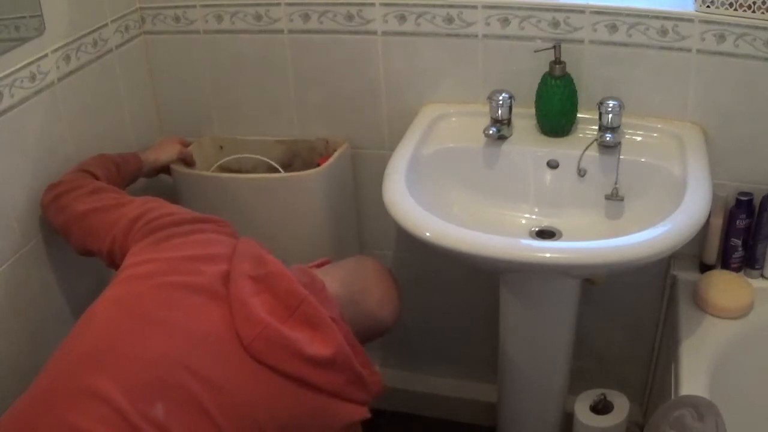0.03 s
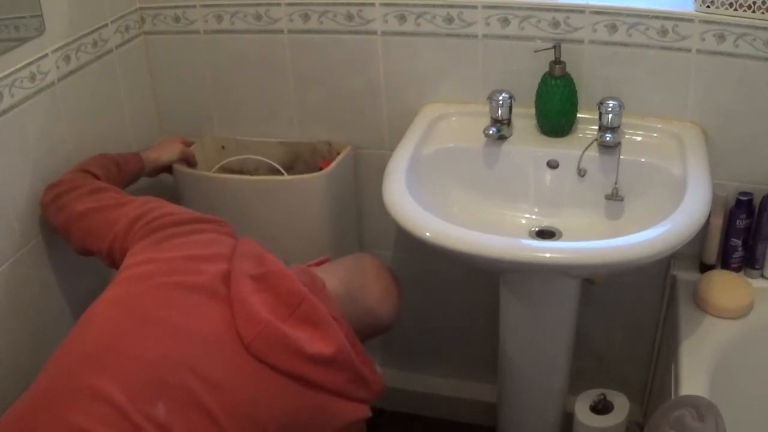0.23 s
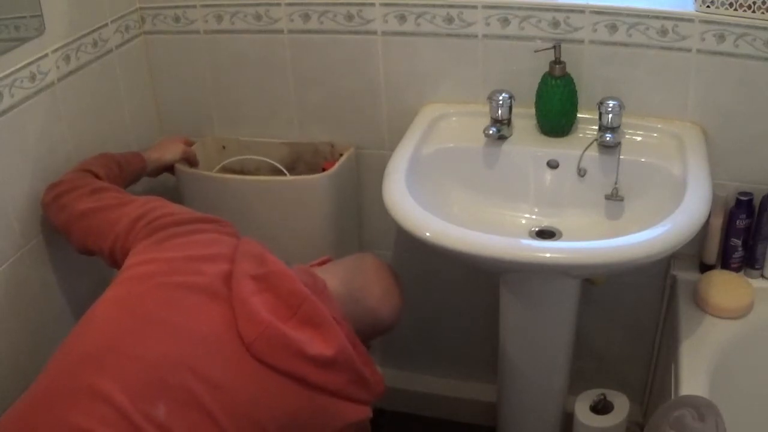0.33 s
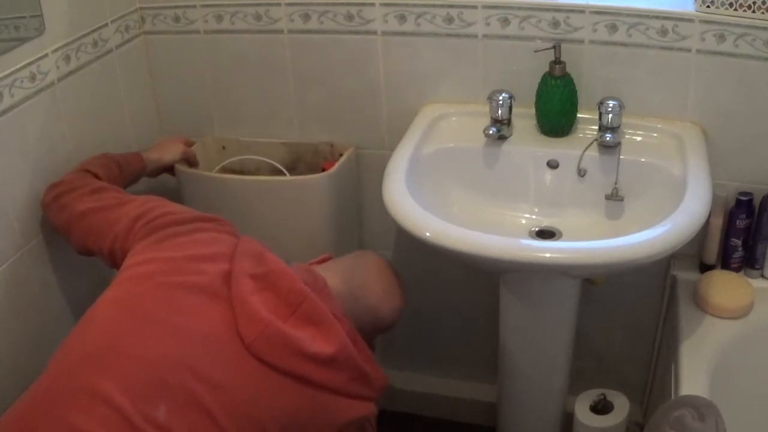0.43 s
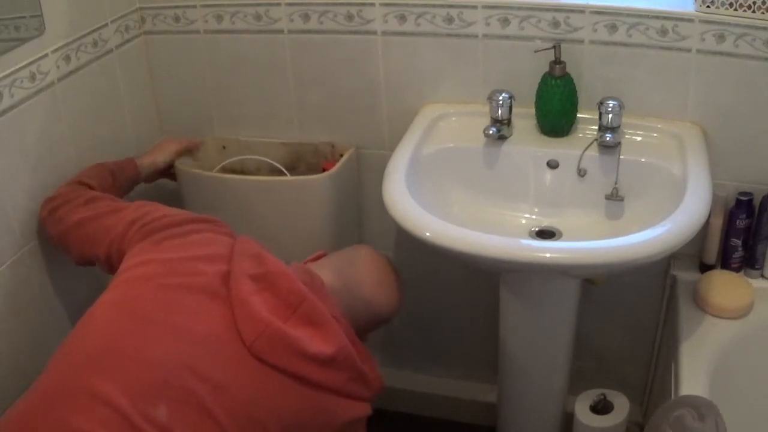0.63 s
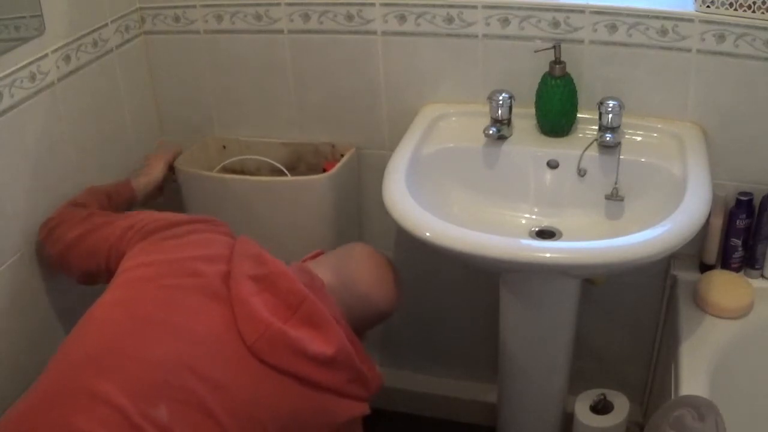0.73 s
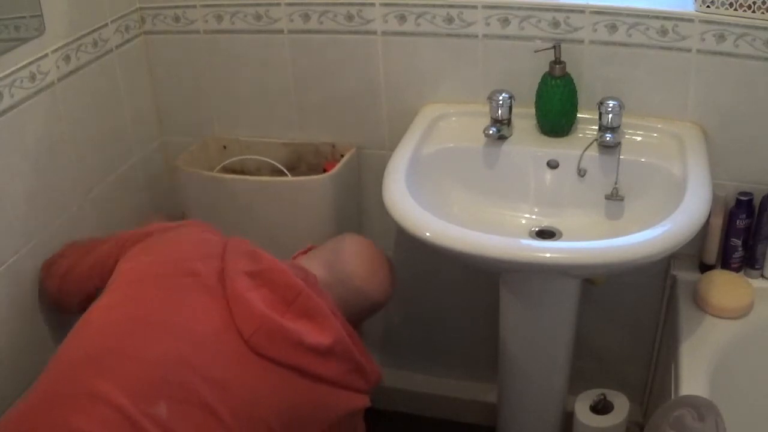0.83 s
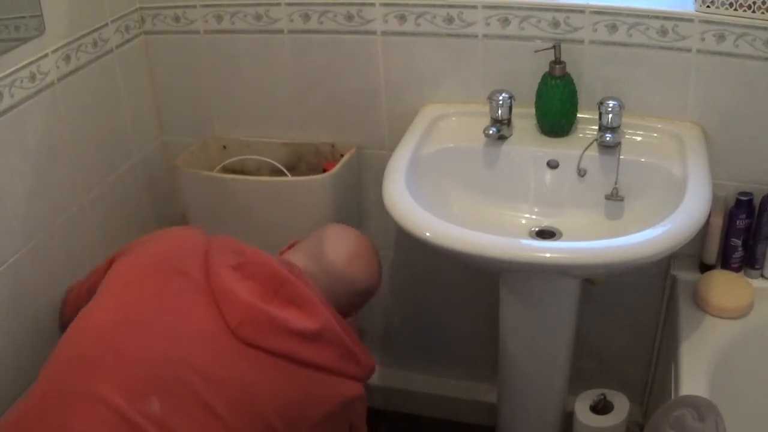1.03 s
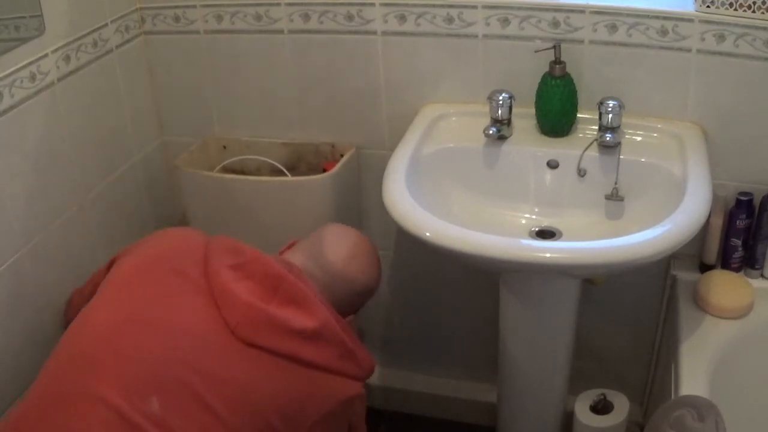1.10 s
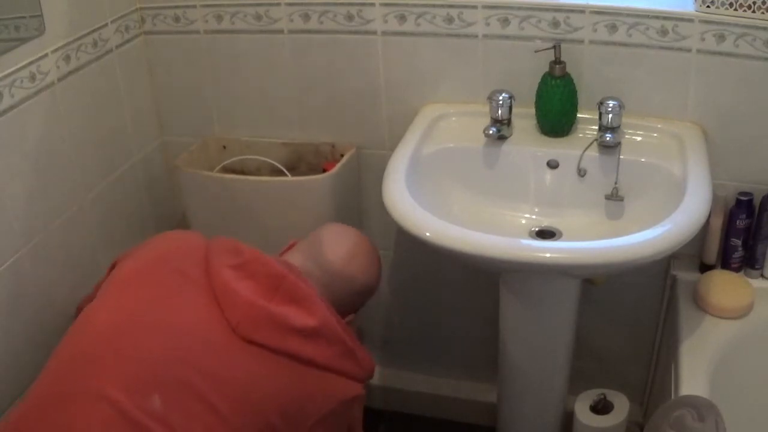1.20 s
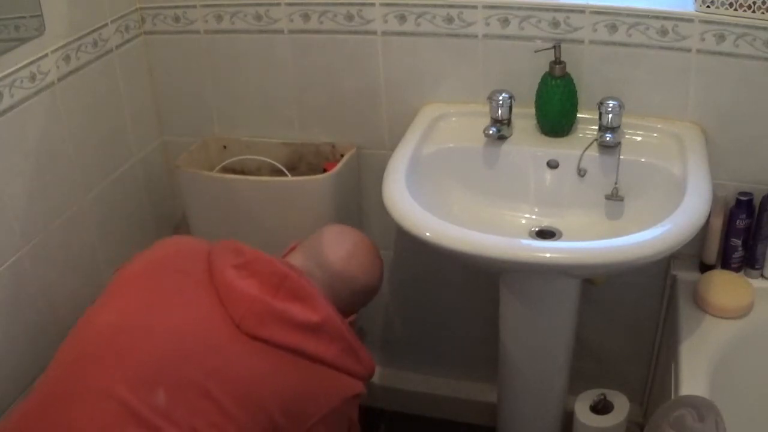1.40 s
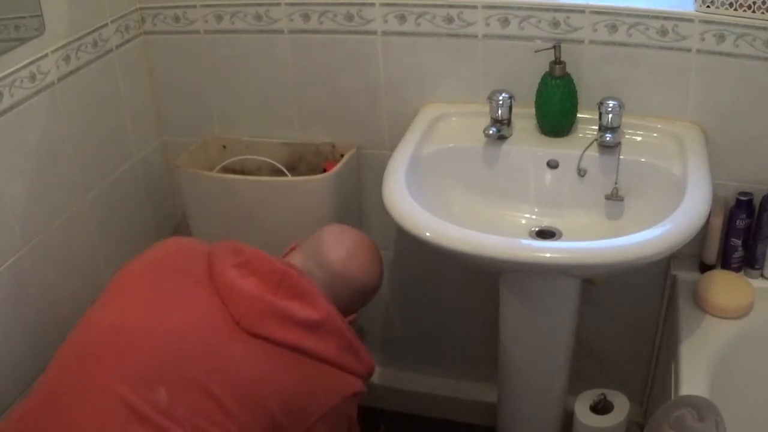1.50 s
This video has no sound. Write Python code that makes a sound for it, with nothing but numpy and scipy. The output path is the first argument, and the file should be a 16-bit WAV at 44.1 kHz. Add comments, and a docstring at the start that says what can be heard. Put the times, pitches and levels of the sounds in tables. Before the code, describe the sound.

A toilet tank booms and rattles briefly as a fitting sticks, followed by light clicks.

```python
"""A stiff fitting judders as someone works it beside an open toilet cistern in a small tiled bathroom.
It sticks and slips many times a second, which makes the water tank boom and rattle.
Then plastic parts click and scuff against the ceramic, and both ring briefly.
Soft bumps and a rubbing sleeve lie over a low room hum, and the tiles add a short echo."""
import sys
import numpy as np
from scipy import signal
from scipy.fft import rfft, irfft, next_fast_len
from scipy.io import wavfile

SR = 44100
rng = np.random.default_rng(int(sys.argv[2]) if len(sys.argv) > 2 else 0)


def output_pcm(signal):
    """Save a mono or channel-first signal as 16-bit PCM at the path in sys.argv[1].

    Samples are clipped to [-1, 1] before scaling.
    """
    pcm = np.clip(np.atleast_2d(signal).T, -1, 1) * 32767
    wavfile.write(sys.argv[1], SR, np.round(pcm).astype(np.int16))


N = 68355
T = np.arange(N) / SR

# tone colour of the still room: (frequency [Hz], relative level [dB])
ROOM_COLOUR = [(20, 2), (70, -14), (100, -13.5), (170, 4), (240, -4.5), (360, -5.5), (600, -15.5),
               (1200, -19.5), (3000, -26), (7000, -29), (11000, -31.5)]
# tones of the room hum: (frequency [Hz], level [dB])
HUM_TONES = [(102.5, -54), (113, -62)]
# how hard the sleeve rubs: (time [s], level [dB])
SLEEVE_LEVELS = [(0, -56), (0.14, -52), (0.6, -64), (0.95, -59), (1.1, -76), (1.17, -58.5), (1.22, -49),
                 (1.3, -52), (1.37, -50.5), (1.45, -54), (1.55, -51.5)]
# tone colour of the sleeve: (frequency [Hz], relative level [dB])
SLEEVE_COLOUR = [(150, -4.5), (400, 6.5), (750, 3.5), (1100, -0.5), (1450, 6.5), (2100, -11), (3300, -7.5),
                 (4000, -15.5), (4600, -4), (6000, -26), (11000, -27.5)]
# soft bumps on the tank: (time [s], fade time [s], knock level [dB], thud level [dB])
BUMPS = [(0.0, 0.019, -29.5, -67), (0.055, 0.08, -39, -60), (0.11, 0.049, -58, -44),
         (0.203, 0.0067, -27, -39), (0.342, 0.031, -29.5, -38.5), (0.53, 0.06, -47, -56),
         (0.651, 0.042, -41.5, -66), (0.743, .01, -48.5, -75)]
# tone colour of a knock: (frequency [Hz], relative level [dB])
KNOCK_COLOUR = [(80, -15), (170, 3), (260, -0.5), (390, 3.5), (470, 0.5), (620, -8), (800, -12),
                (1400, -24), (4000, -34), (10000, -43)]
# tone colour of a deep thud: (frequency [Hz], relative level [dB])
THUD_COLOUR = [(15, -11), (32, 2), (60, -15), (115, -16), (200, -26), (600, -48)]
# touches that set one part ringing: (time [s], frequency [Hz], level [dB], ring time [s])
PINGS = [(0.18, 2150, -35.5, 0.15), (0.259, 1027, -28, 0.48), (0.263, 540, -21, 0.13),
         (0.258, 1492, -28, 0.27), (0.53, 1340, -43, 0.21), (0.739, 892, -42, 0.65),
         (0.741, 2312, -32.5, 0.25), (0.743, 3410, -43, 0.19), (0.76, 2833, -47, 0.18),
         (0.774, 2660, -38, 0.18), (0.856, 2770, -44, .15), (1.238, 2318, -42.5, 0.26),
         (1.264, 1350, -46, 0.2), (1.26, 4490, -46, 0.26), (1.476, 5592, -44.5, .28),
         (1.475, 2766, -41.5, 0.27), (1.476, 1499, -41.5, 0.3), (1.495, 1105, -48.5, 0.49)]
# clicks and scuffs: (time [s], fade time [s], strength in each of four bands, low to high [dB])
CLICKS = [(0.097, 0.0019, -56, -54.5, -86, -68), (0.155, 0.01, -38, -41.5, -45.5, -45),
          (0.184, 0.0055, -41.5, -44.5, -42.5, -46), (0.208, 0.0027, -35, -45.5, -46, -47),
          (0.257, .012, -32.5, -34.5, -43.5, -49), (0.523, 0.015, -51, -50, -58, -68),
          (0.595, 0.015, -52, -56, -51, -55), (0.632, 0.0058, -46.5, -48.5, -44.5, -48),
          (0.656, 0.013, -41, -39.5, -38.5, -44), (0.687, 0.027, -44, -46.5, -45, -48),
          (0.739, 0.0084, -39.5, -33, -43, -55), (0.757, .006, -39, -40, -47, -53),
          (0.857, 0.011, -46, -43.5, -54, -68), (1.129, 0.024, -48, -51, -68, -70),
          (1.237, 0.0071, -49, -41, -43, -61), (1.262, 0.013, -43.5, -40.5, -49.5, -58),
          (1.392, 0.0072, -52, -53, -55, -68), (1.407, 0.035, -57, -41, -70, -66),
          (1.47, 0.01, -40.5, -38, -33.5, -46), (1.516, 0.0079, -49.5, -46, -68, -60)]
# borders of those four bands: (frequency [Hz])
BAND_EDGES_HZ = [700, 1900, 3800, 6300, 11500]
# tone colour of the clicks: (frequency [Hz], gain [dB])
CLICK_COLOUR = [(700, -12), (900, -8), (1150, -9), (1450, 0.5), (1950, -5), (2400, -3), (3300, -4),
                (4100, -3), (4800, -4), (6000, -8), (7000, -3.5), (8200, 4), (10000, -7), (11000, -6)]
# notes the parts ring with: (frequency [Hz], relative level [dB], ring time [s])
PART_NOTES = [(907, -2, 0.2), (1120, -19, 0.18), (1351, -8, 0.36), (1478, -11, 0.5), (1620, -10, 0.29),
              (2210, -9, 0.23), (2670, -7.5, 0.28), (2836, 0.5, 0.14), (2960, -45, 0.31), (3410, -8, 0.31),
              (3670, -28, 0.099), (4500, -12.5, 0.6), (5180, -20, 0.13)]
# the tank hums as it is nudged: (time [s], level of its lower tone [dB])
NUDGE_LEVELS = [(0.0, -39.5), (0.045, -38), (0.09, -68), (0.6, -56.5), (0.66, -51.5), (0.695, -36.5),
                (0.73, -52), (0.765, -44), (0.83, -56), (1.0, -69)]
# the tank booms as the fitting slips: (time [s], lower tone [dB], upper tone [dB], judder octave [dB])
BOOM_LEVELS = [(0.183, -48, -74, -70), (0.196, -20, -46, -60), (0.213, -26, -32, -33),
               (0.221, -8, -20.5, -53), (0.25, -13.5, -17, -42), (0.29, -14, -16.5, -21.5),
               (0.312, -12, -16, -10.5), (0.335, -35.5, -14, -22), (0.39, -13.5, -48, -26.5),
               (0.425, -30.5, -49, -35), (0.46, -35.5, -28.5, -43.5), (0.5, -41.5, -56.5, -49.5),
               (0.6, -58.5, -57, -53)]
# force of the judder: (time [s], rattle strength [dB], grit strength [dB])
JUDDER_LEVELS = [(0.2, -67, -48.5), (0.216, -20, -66), (0.245, -28.5, -67), (0.269, -12, -28.5),
                 (0.286, -36, -39.5), (0.315, -20.5, -44), (0.355, -35.5, -39), (0.39, -43.5, -54),
                 (0.46, -49, -74), (0.5, -75, -87)]
# notes of the tank and pipes: (frequency [Hz], relative level [dB], ring time [s])
TANK_NOTES = [(285, -26, .15), (334, -15, 0.18), (422, 12, 0.19), (538, 8, 0.092), (635.6, 1.5, 0.092),
              (721, -4, 0.17), (860, -23, 0.32), (1016, 1.5, .06), (1028, -2.5, 0.11), (1491, 4, 0.14)]
# tone colour of the rattle: (frequency [Hz], relative level [dB])
RATTLE_COLOUR = [(120, -19.5), (260, 11), (550, -0.5), (1000, -3.5), (1300, -13), (1600, -13), (2500, -20),
                 (5000, -46)]
# tone colour of the gritty rubbing: (frequency [Hz], relative level [dB])
GRIT_COLOUR = [(900, -8.5), (1800, 9), (2900, 2), (3500, 2), (5000, -1), (6000, -11), (7200, -15),
               (7900, -2.5), (8700, -2), (9400, -12.5), (11000, -19)]

JUDDER_HZ = 179.3   # slips per second
LEFT_RIGHT = np.array([[1], [-1]])   # adds on the left, takes away on the right


def from_db(db):
    """Turn decibels into a number to multiply by."""
    return 10 ** (np.asarray(db) / 20)


def rms_one(x):
    """Scale a signal so that its average level (rms) is 1."""
    return x / np.sqrt(np.mean(x ** 2) + 1e-20)


def gains(rows):
    """Turn each dB column of a table into a loudness curve, silent outside the listed times."""
    times, *columns = np.transpose(rows)
    return [from_db(np.interp(T, times, db, left=-120, right=-120)) for db in columns]


def colour(x, points, keep_level=True):
    """Filter a sound along (Hz, dB) points; with keep_level, white noise stays as strong as it was."""
    size = next_fast_len(2 * N)
    hz, db = np.transpose(points)
    gain = from_db(np.interp(np.log(np.fft.rfftfreq(size, 1 / SR) + 1), np.log(hz), db))
    cepstrum = irfft(np.log(rms_one(gain) if keep_level else gain), size)
    # folding the second half onto the first stops the filter from sounding before its input
    cepstrum[1:size // 2] *= 2
    cepstrum[size // 2 + 1:] = 0
    return irfft(rfft(x, size) * np.exp(rfft(cepstrum)), size)[..., :N]


def drift(hz):
    """A smooth random wobble of size about 1; hz sets how fast it moves."""
    smoothing = signal.butter(2, hz, fs=SR, output="sos")
    return rms_one(signal.sosfilt(smoothing, rng.standard_normal(2 * N))[N:])


def stereo_noise(side_db=-8):
    """White noise that is mostly the same on the left and right."""
    mid, side = rng.standard_normal((2, N))
    return rms_one(mid + from_db(side_db) * side * LEFT_RIGHT)


def grains(spread_db=8.5):
    """Rough noise from tiny contacts of uneven size."""
    return rms_one(rng.standard_normal(N) * from_db(spread_db * drift(727)))


def burst(start, fade_s, rise_s=0.0016):
    """A run of tiny contacts that rises quickly and dies, with the energy of 30 ms at level 1."""
    age = np.maximum(T - start, 0)
    envelope = (1 - np.exp(-age / rise_s)) * np.exp(-age / fade_s)
    return rms_one(grains() * envelope) * np.sqrt(.03 * SR / N)


def ring(x, hz, ring_s):
    """Each push in x starts a note that fades by 60 dB over its ring time."""
    decay, step = from_db(-60 / (ring_s * SR)), 2 * np.pi * hz / SR
    return signal.lfilter([0, np.sin(step)], [1, -2 * decay * np.cos(step), decay ** 2], x + 1e-18)


def bathroom(x, early_s=0.13, tail_s=0.4):
    """Weak direct sound, dense early echoes off the tiles and a short tail."""
    early, tail = (rms_one(from_db(-60 * T / ring_s)) for ring_s in (early_s, tail_s))
    echo = rms_one(stereo_noise() * np.hypot(from_db(0.5) * early, tail)) / np.sqrt(N)
    echo[:, 0] += from_db(-15.5)   # the direct sound
    return signal.fftconvolve(x[None], echo, axes=1)[:, :N]


def background(room_db=-53, throb_db=2):
    """A throbbing low hum, the fine grainy rub of a sleeve and steady room noise."""
    hum = 0
    for hz, db in HUM_TONES:
        height = np.sqrt(2) * from_db(db + throb_db * drift(14))
        hum = hum + height * np.sin(2 * np.pi * hz * T + 0.12 * drift(7.4))
    pressure, = gains(SLEEVE_LEVELS)
    sleeve = bathroom(colour(pressure * grains(), SLEEVE_COLOUR))
    return hum + sleeve + from_db(room_db) * colour(stereo_noise(), ROOM_COLOUR)


def bumps(direct_db=-4):
    """Hand and part knock softly on the tank, with a deep thud through the wall."""
    knocks = sum(from_db(db) * burst(start, fade_s) for start, fade_s, db, _ in BUMPS)
    thuds = sum(from_db(db) * burst(start, fade_s) for start, fade_s, _, db in BUMPS)
    knocks, thuds = colour(knocks, KNOCK_COLOUR), colour(thuds, THUD_COLOUR)
    return from_db(direct_db) * knocks + bathroom(knocks) + bathroom(thuds).mean(axis=0)


def pings(waver_db=3.7):
    """A touch makes the ceramic or a fitting ring with one clear, wavering note."""
    notes = 0
    for start, hz, db, ring_s in PINGS:
        age = np.maximum(T - start, 0)
        envelope = from_db(db - 60 * age / ring_s) * (1 - np.exp(-age / 0.001))
        waver = from_db(waver_db * drift(40))
        phase = rng.normal(0, 0.56, (2, 1))   # left and right are a little out of step
        notes = notes + envelope * waver * np.sin(2 * np.pi * hz * age + phase)
    return notes


def clicks(scuff_db=-2, ring_db=-4):
    """Plastic parts tap and scuff the ceramic, each touch with its own brightness, and ring briefly."""
    rows = np.array(CLICKS)
    bursts = np.array([burst(start, fade_s) for start, fade_s in rows[:, :2]])
    starts = (rows[:, 0] * SR).astype(int)
    scuffs, rings = 0, 0
    for k, (low, high) in enumerate(zip(BAND_EDGES_HZ, BAND_EDGES_HZ[1:])):
        strength = from_db(rows[:, 2 + k])
        band = signal.butter(3, [low, high], "band", fs=SR, output="sos")
        make_up = np.sqrt(SR / 2 / (high - low))   # a narrow band lets less noise through
        scuffs = scuffs + (-1) ** k * make_up * signal.sosfilt(band, strength @ bursts)
        for hz, db, ring_s in PART_NOTES:
            if low <= hz < high:
                taps = np.zeros(N)
                taps[starts] = strength * from_db(db + rng.normal(0, 2.4, len(rows)))
                balance = from_db(rng.normal(0, 2.2, (2, 1)))
                rings = rings + balance * ring(taps, hz, ring_s)
    scuffs = bathroom(colour(scuffs, CLICK_COLOUR, keep_level=False))
    return from_db(scuff_db) * scuffs + from_db(ring_db) * rings


def tank_boom(lower_hz=176, upper_hz=199, room_hz=115.7, room_lag_s=0.061):
    """The judder drives two low tank tones that throb together, its own octave and a deep room note."""
    lower, upper, octave = gains(BOOM_LEVELS)
    nudge, = gains(NUDGE_LEVELS)
    turn = 2 * np.pi * (T - 0.2025)   # the two tones are in step at this moment
    tank_lead, octave_lead = 0.2 * LEFT_RIGHT, 1.025 * LEFT_RIGHT   # left runs ahead [radians]
    lower_tone = (lower + nudge) * np.sin(lower_hz * turn + tank_lead)
    upper_tone = upper * np.sin(upper_hz * turn + tank_lead)
    room_swell = from_db(-20.5) * np.interp(T - room_lag_s, T, lower)
    room_tone = room_swell * np.sin(room_hz * turn + 0.53 * drift(11))
    octave_tone = octave * np.sin(2 * JUDDER_HZ * turn + octave_lead + 0.4 * drift(44))
    return np.sqrt(2) * (lower_tone + upper_tone + room_tone + octave_tone)


def fitting_judder(jitter=0.021, slip_spread_db=4, width=0.46, tank_db=-5.5, rattle_db=-1.5):
    """The fitting sticks and slips; each uneven slip knocks the tank and sheds grit."""
    rattle, grit = gains(JUDDER_LEVELS)
    cycles = np.cumsum(JUDDER_HZ * (1 + jitter * drift(80))) / SR
    ticks = np.diff(np.floor(cycles), prepend=0)   # one tick for each slip
    slips = rms_one(ticks * from_db(slip_spread_db * drift(91)))
    after_slip = np.exp(-2.5 * (cycles % 1))
    chatter = rms_one(grains() * after_slip)
    force = rattle * rms_one(slips + 0.46 * chatter)
    stereo_spread = width * rattle * rms_one(grains() * after_slip) * LEFT_RIGHT
    tank = sum(from_db(db) * ring(force + stereo_spread, hz, ring_s) for hz, db, ring_s in TANK_NOTES)
    bass_cut = signal.butter(4, 260, "high", fs=SR, output="sos")
    tank = rms_one(signal.sosfilt(bass_cut, tank)) * force.std() * from_db(tank_db)
    rattling = from_db(rattle_db) * colour(rattle * chatter, RATTLE_COLOUR)
    rubbing = colour(grit * chatter, GRIT_COLOUR)
    return tank + bathroom(rattling + rubbing)


def scene():
    """Add all the sounds together in stereo."""
    return tank_boom() + fitting_judder() + clicks() + pings() + bumps() + background()


def record(dry, cutoff_hz=10950):
    """Cut off the highest treble steeply."""
    return signal.sosfilt(signal.ellip(12, .2, 80, cutoff_hz, fs=SR, output="sos"), dry)


dry = scene()
out = record(dry)
output_pcm(out)
```